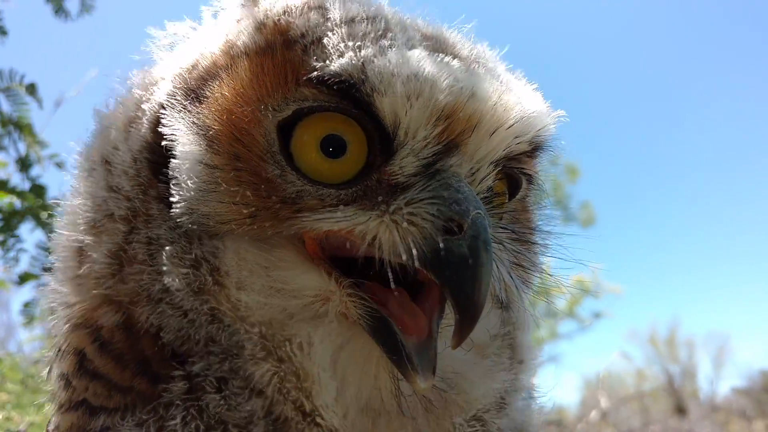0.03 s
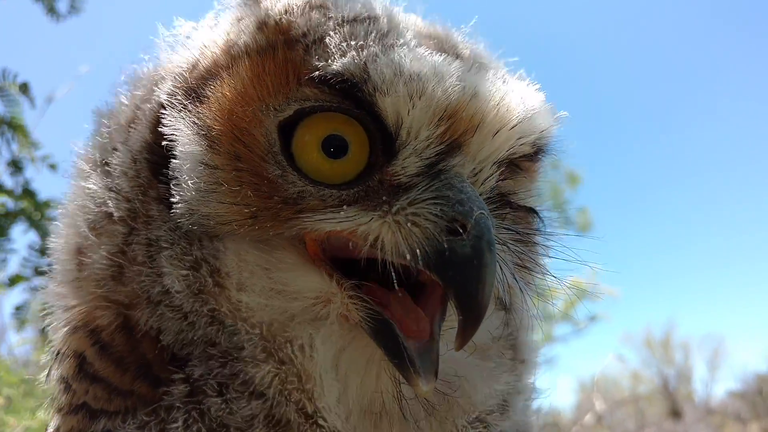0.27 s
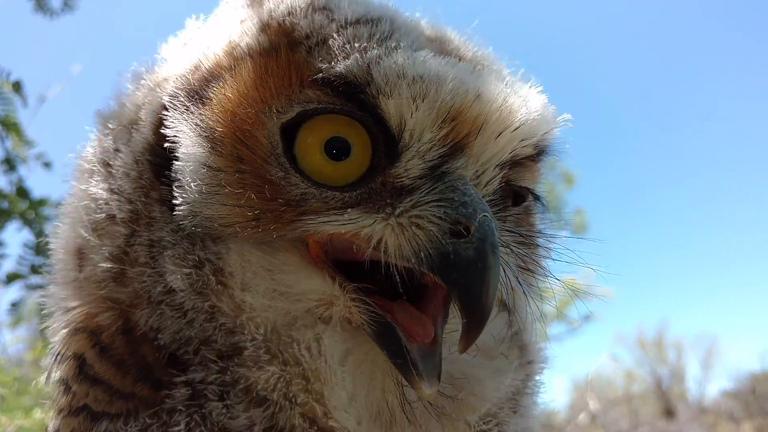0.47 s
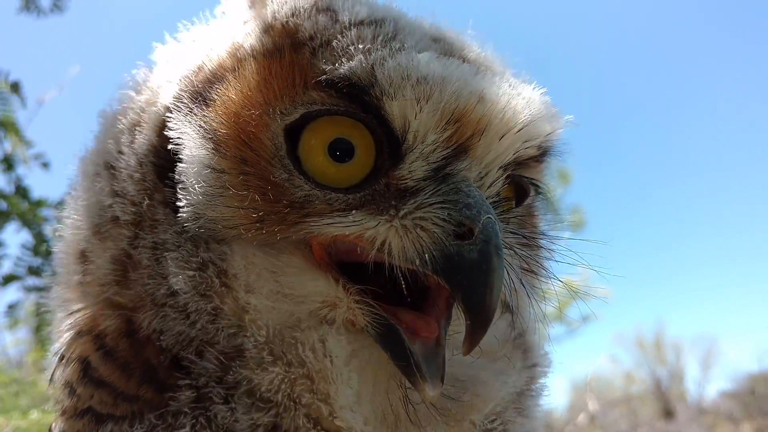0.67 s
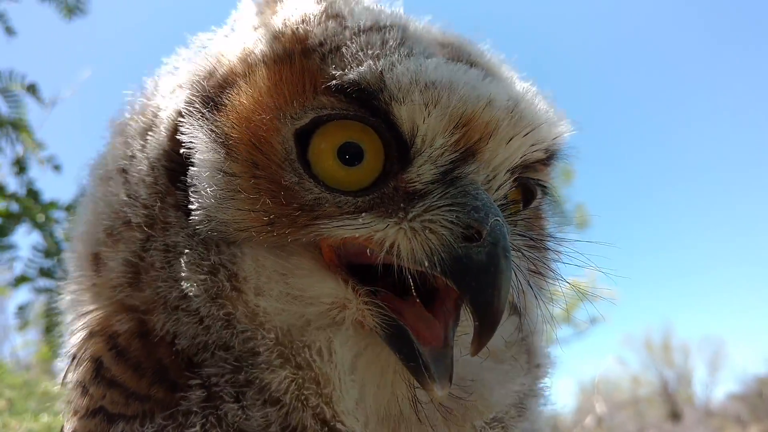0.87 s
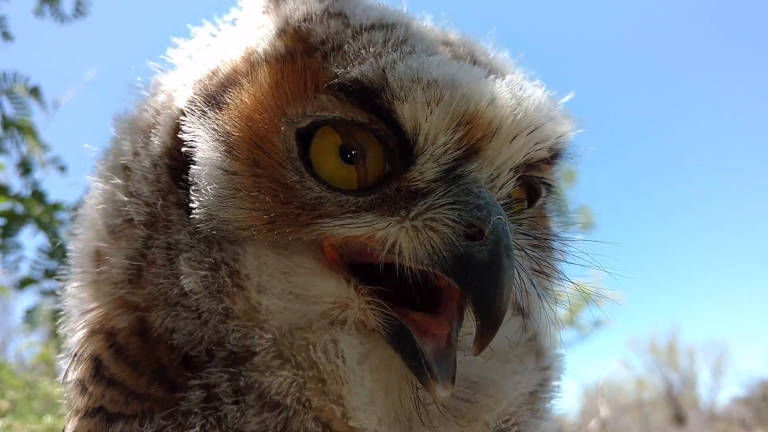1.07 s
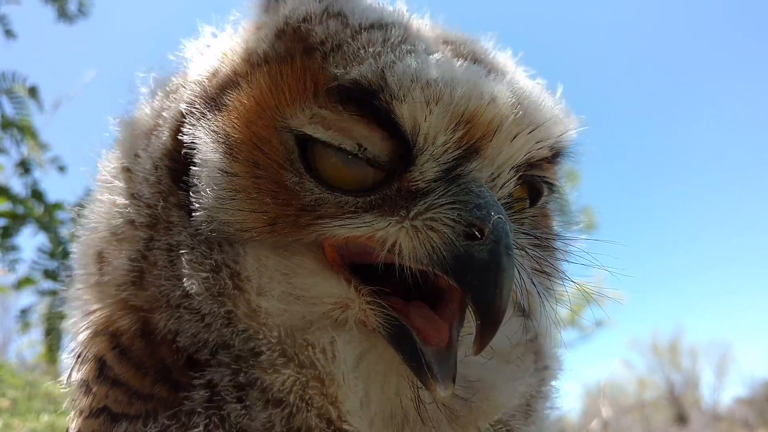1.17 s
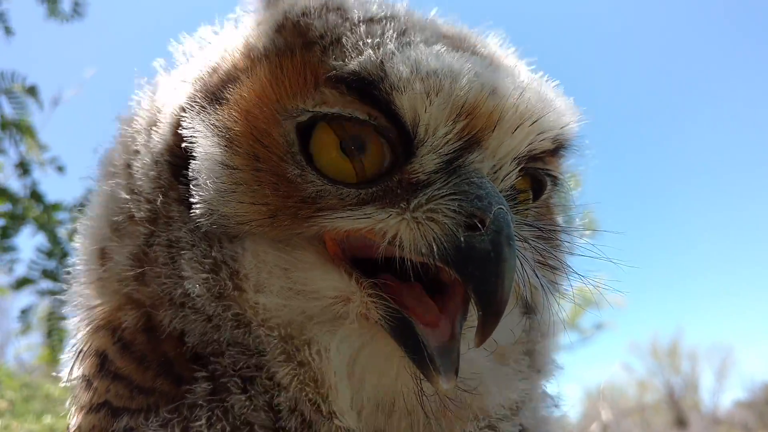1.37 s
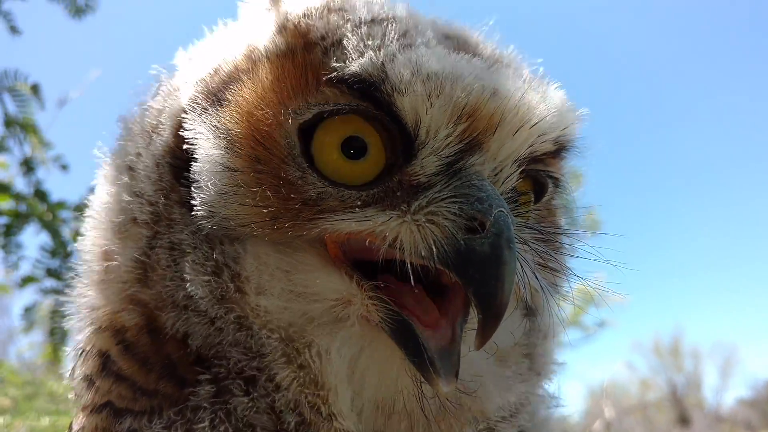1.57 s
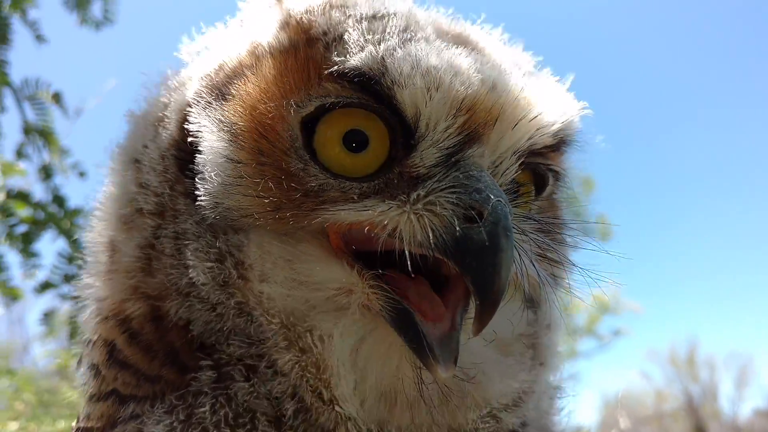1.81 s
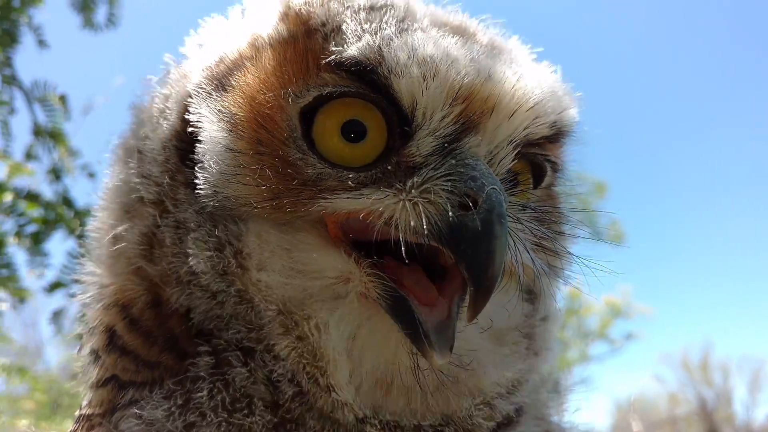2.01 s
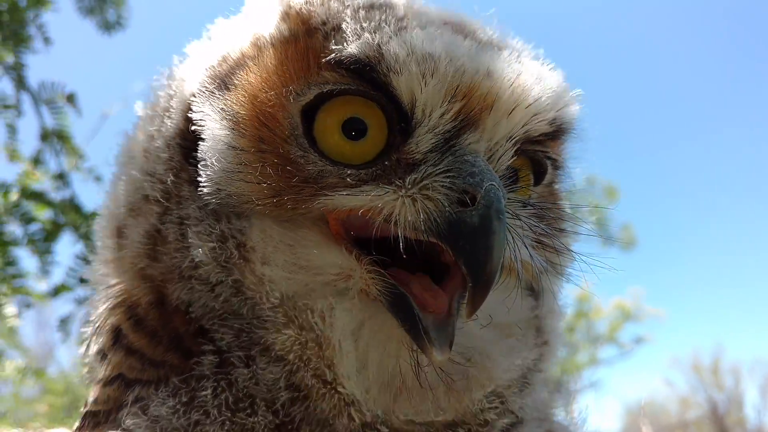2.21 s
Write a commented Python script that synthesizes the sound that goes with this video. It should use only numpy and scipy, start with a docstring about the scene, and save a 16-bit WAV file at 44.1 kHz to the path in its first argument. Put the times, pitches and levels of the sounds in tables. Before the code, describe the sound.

Dry, close clicks, likely from a young owl's bill, end in one quick rattle with soft brushing. Before them, a breeze rumbles on the microphone in short puffs. A faint hiss of open air continues throughout.

```python
"""Young owl in a breeze

Outdoors, over a steady hiss of distant air, wind puffs on two microphone ports.
Something brushes twice, amid dry clicks that end in one quick run: the bill of a young owl
close by, or a touch on the camera. Each click is a dull knock, a bright ring and a crack.
The stereo image is widened by subtracting from each port a delayed copy of the other."""
import sys
import numpy as np
from scipy import signal
from scipy.fft import rfft, irfft
from scipy.io import wavfile
from scipy.ndimage import uniform_filter1d

SR = 44100
rng = np.random.default_rng(int(sys.argv[2]) if len(sys.argv) > 2 else 0)


def store_wav(level_fs):
    """Save 16-bit WAV to argv[1]."""
    pcm = np.round(np.clip(np.atleast_2d(level_fs), -1, 1) * 32767)
    wavfile.write(sys.argv[1], SR, pcm.T.astype(np.int16))


N = 99225
TIME_S = np.arange(N) / SR
BIN_HZ = np.maximum(np.arange(N // 2 + 1) * SR / N, 1)


def from_db(db):
    """Decibels to gain."""
    return 10 ** (np.asarray(db) / 20)


def at_bins(points):
    """Rows of (f/Hz, value), interpolated over log f at the FFT bins."""
    hz, value = np.transpose(points)
    return np.interp(np.log(BIN_HZ), np.log(hz), value)


def pan(db):
    """Port gains for a left-minus-right level."""
    return from_db(np.array([[db], [-db]]) / 2)


def delayed(x, delay_s):
    """Circular fractional delay."""
    size = x.shape[-1]
    hz = np.arange(size // 2 + 1) * SR / size
    return irfft(rfft(x) * np.exp(-2j * np.pi * hz * delay_s), size)


def filtered(x, hz, kind):
    """Second-order low- or high-pass."""
    return signal.sosfilt(signal.butter(2, hz, kind, fs=SR, output="sos"), x)


def mode(x, hz, t60_s):
    """One damped resonance driven by x."""
    r, w = np.exp(-np.log(1000) / (t60_s * SR)), 2 * np.pi * hz / SR
    return signal.lfilter([1, -r * np.cos(w)], [1, -2 * r * np.cos(w), r * r], x)


def widen(ports, share=0.77, delay_s=0.000388):
    """Each port minus a delayed share of the other."""
    return ports - share * delayed(ports[::-1], delay_s)


def widened_power(ports):
    """Mean power after widening."""
    return np.mean(widen(ports) ** 2) + 1e-20


def noise(spectrum, correlation=0):
    """Coloured noise at both ports, unit power after widening."""
    mid, side = rfft(rng.standard_normal((2, N)))
    white = np.sqrt(1 + correlation) * mid + np.sqrt(1 - correlation) * side * [[1], [-1]]
    ports = irfft(from_db(at_bins(spectrum)) * white, N)
    return ports / np.sqrt(widened_power(ports))


def air(level_db=-52.5, pan_db=2.9):
    """Steady hiss of distant air, alike at both ports in the bass."""
    # f/Hz, relative density/dB
    spectrum = [(20, -14), (45, -9), (90, -1), (170, 3), (300, -0.5), (520, 0), (800, -5.5), (1200, -9.5),
                (1900, -13), (3200, -16), (4500, -21), (8000, -24), (14500, -33), (16000, -42)]
    # f/Hz, correlation of the ports
    correlation = [(150, 0.65), (400, 0.76), (700, 0.1), (1400, -0.053), (2500, -0.31), (4000, 0.11)]
    return from_db(level_db) * pan(pan_db) * noise(spectrum, at_bins(correlation))


def eddies(spectrum, correlation, window_samples):
    """Turbulent noise, levelled by its running power."""
    ports = noise(spectrum, correlation)
    running_power = uniform_filter1d(np.mean(widen(ports) ** 2, axis=0), size=window_samples)
    return ports / np.sqrt(running_power + 1e-6)


def wind():
    """Puffs over a light breeze at the ports: deep rumble, mostly antiphase, and small-eddy flutter."""
    # t/s, rumble/dB, flutter/dB
    breeze = [(0, -53, -76), (.21, -49, -66), (.33, -45, -49), (.43, -40.5, -50), (.6, -34.5, -46),
              (0.741, -46.5, -45), (.8, -42, -60), (.97, -55.5, -63), (1.3, -65, -77), (2.25, -72, -74)]
    # peak t/s, half width/s, rumble/dB, flutter/dB
    puffs = [(0.109, 0.0067, -37, -50.5), (0.193, 0.009, -30.5, -37), (0.266, 0.014, -18, -24),
             (0.306, 0.0034, -15.5, -22.5), (.357, 0.0077, -21.5, -35), (.39, .008, -31, -48),
             (0.477, 0.019, -42, -38.5), (0.512, 0.0061, -28.5, -37), (0.554, 0.0099, -22, -28.5),
             (0.579, 0.0071, -28, -21.5), (0.598, 0.0097, -23, -28.5), (0.629, 0.0041, -31, -38),
             (.682, .009, -33.5, -51), (1.127, .006, -53, -65), (1.17, 0.0067, -52, -58),
             (2.084, .006, -63, -46)]
    # f/Hz, relative density/dB
    rumble_spectrum = [(20, -19), (40, -18), (65, -6.5), (100, 5.5), (135, -5.5), (200, -27), (400, -47),
                       (2000, -100)]
    flutter_spectrum = [(60, -33.5), (110, 1.5), (160, 1.5), (210, -8), (280, -15.5), (400, -37),
                        (700, -55), (2000, -88)]
    times_s, *levels_db = np.transpose(breeze)
    power = from_db([np.interp(TIME_S, times_s, db) for db in levels_db]) ** 2
    for peak_s, width_s, rumble_db, flutter_db in puffs:
        swell = np.exp(-((TIME_S - peak_s) / width_s) ** 2)
        power += from_db([[rumble_db], [flutter_db]]) ** 2 * swell
    rumble_gain, flutter_gain = np.sqrt(power)
    rumble = eddies(rumble_spectrum, correlation=-0.59, window_samples=700)
    flutter = eddies(flutter_spectrum, correlation=0, window_samples=500)
    return rumble_gain * rumble + flutter_gain * flutter


def knock(tap, right_lag_s=0.0007):
    """Dull part of a click: a softened tap drives low modes."""
    # f/Hz, relative level/dB, t60/s
    modes = [(172, 15.5, 0.011), (472, 12, 0.018), (860, -18, .006), (1320, -22, 0.011)]
    soft_tap = signal.lfilter([1], [1, -0.75], tap)
    body = sum(from_db(db) * mode(soft_tap, hz, t60_s) for hz, db, t60_s in modes)
    body = filtered(body, 1270, "low")
    return np.array([body, delayed(body, right_lag_s)])


def ring(contact, hz, t60_s):
    """Bright part of a click: a resonance, its onset rounded by a second pass."""
    return filtered(mode(mode(contact, hz, t60_s), hz, t60_s / 2), 2500, "high")


def clicks(size=2048):
    """Dry contacts: a knock, then a short ring with an overtone and a noisy crack."""
    # t/s, knock/dB, ring/dB, ring f/Hz, overtone/dB, crack/dB, pan/dB
    contacts = [(.6560, -73, -57, 4400, -55, -51, 5), (.6630, -61, -66, 3900, -49, -59, 5),
                (0.803, -51, -63, 3850, -65, -51, 0), (0.8137, -46, -55, 3970, -52, -42.5, -10.5),
                (0.9163, -72, -59, 4100, -48, -54, 0), (.9220, -23.5, -31.5, 4000, -39.5, -46, 1),
                (.9300, -35, -56, 3920, -63, -69, -7.5), (0.9381, -26, -28.5, 3714, -26.5, -34.5, -1),
                (0.9493, -46, -41, 3630, -57, -60, -16), (0.955, -28.5, -35.5, 3700, -67, -62, -3),
                (0.9588, -60, -37, 3230, -63, -45.5, -8), (0.9597, -40.5, -45, 3170, -71, -51, -8),
                (.9629, -36, -40.5, 2900, -64, -46, -5.5), (0.9841, -62, -72, 3600, -69, -50, 1),
                (0.997, -68, -76, 3720, -61, -54, 0)]
    contact_decay_s, crack_decay_s = 0.00056, 0.00051
    bright_delay_s, right_lag_s = 0.00027, 0.000278
    level_window_s = 0.004  # levels: each part's energy spread over this time
    out, t = np.zeros((2, N + size)), np.arange(size) / SR
    tap = signal.unit_impulse(size)
    dull = knock(tap)
    for start_s, knock_db, ring_db, ring_hz, overtone_db, crack_db, pan_db in contacts:
        grit, burst = rng.standard_normal((2, 2, size))
        contact = tap + 0.36 * grit * np.exp(-t / contact_decay_s)
        tone = ring(contact, ring_hz, t60_s=0.0039)
        overtone = ring(contact, 1.93 * ring_hz, t60_s=0.0022)
        crack = filtered(burst * np.exp(-t / crack_decay_s), 4500, "high")
        crack = filtered(crack, 12400, "low")
        parts = [(knock_db, dull)]
        for db, (left, right) in (ring_db, tone), (overtone_db, overtone), (crack_db, crack):
            ports = [delayed(left, bright_delay_s), delayed(right, bright_delay_s + right_lag_s)]
            parts.append((db, np.array(ports)))
        click = sum(from_db(db) * part * np.sqrt(level_window_s * SR / size / widened_power(part))
                    for db, part in parts)
        start = int(start_s * SR)
        out[:, start:start + size] += pan(pan_db) * click
    return out[:, :N]


def brushes(attack_s=0.0022, release_s=0.0033, grain_db=1, grain_s=0.00091):
    """Short grainy friction strokes, each with a hollow body and a hiss."""
    # t/s, length/s, body/dB, hiss/dB
    strokes = [(0.699, 0.013, -45.5, -56.5), (0.715, 0.026, -40.5, -45), (0.746, 0.0051, -49, -56),
               (0.802, 0.0098, -53, -52), (.819, 0.0063, -40.5, -49), (0.93, 0.037, -41.5, -48),
               (0.971, 0.019, -79, -52)]
    # f/Hz, relative density/dB
    body_spectrum = [(100, -7), (300, 7), (520, 7.5), (800, -11.5), (1400, -0.5), (2200, -27), (4000, -38),
                     (14000, -65)]
    hiss_spectrum = [(100, -20), (1400, 1), (2500, 4.5), (4000, 2.5), (5500, 0), (8000, 3.5), (14000, -9.5)]
    body_gain, hiss_gain = np.zeros((2, N))
    for start_s, length_s, body_db, hiss_db in strokes:
        rise = np.clip((TIME_S - start_s) / attack_s + 0.5, 0, 1)
        fall = np.exp(-np.maximum(TIME_S - start_s - length_s, 0) / release_s)
        body_gain += from_db(body_db) * rise * fall
        hiss_gain += from_db(hiss_db) * rise * fall
    grain = from_db(grain_db * np.interp(TIME_S / grain_s, np.arange(N), rng.standard_normal(N)))
    grain /= np.sqrt(np.mean(grain ** 2))
    return grain * (body_gain * noise(body_spectrum) + hiss_gain * noise(hiss_spectrum))


def scene():
    """All sounds at the two ports."""
    return air() + wind() + brushes() + clicks()


def record(dry):
    """Stereo widening, then a steep low-pass."""
    stop_db, stop_hz = 60, 16500
    return signal.sosfilt(signal.cheby2(16, stop_db, stop_hz, fs=SR, output="sos"), widen(dry))


dry = scene()
out = record(dry)
store_wav(out)
```